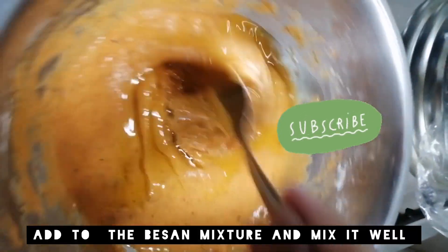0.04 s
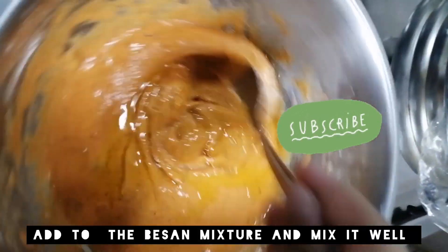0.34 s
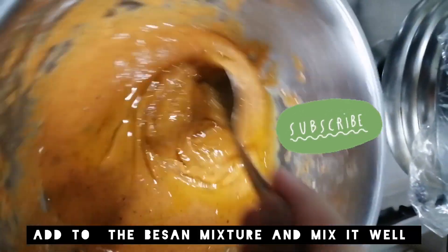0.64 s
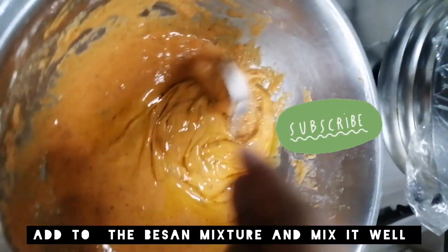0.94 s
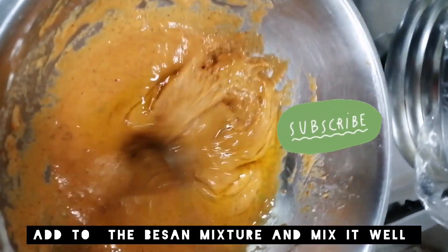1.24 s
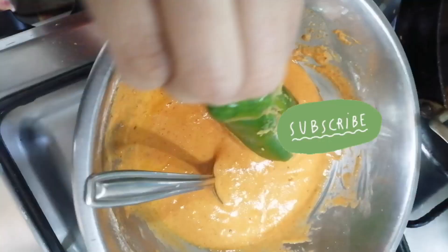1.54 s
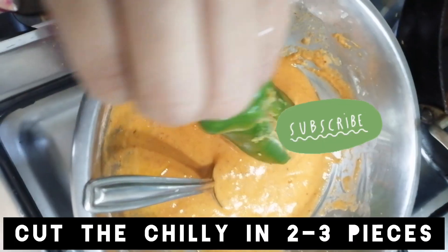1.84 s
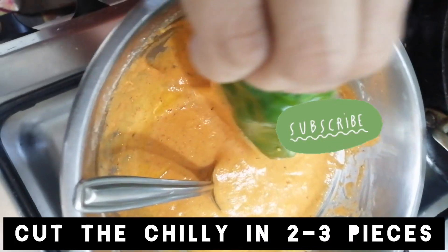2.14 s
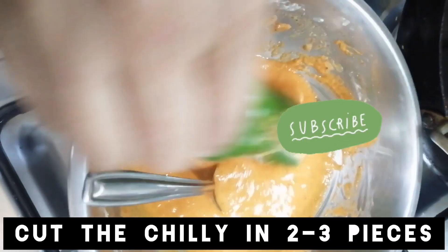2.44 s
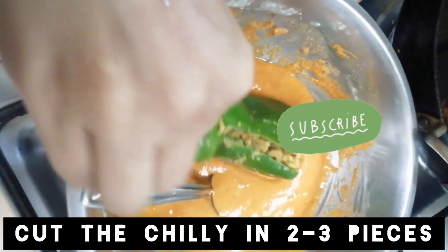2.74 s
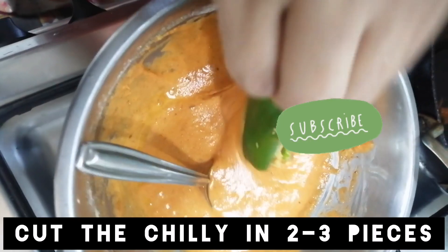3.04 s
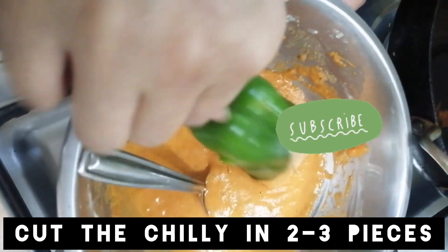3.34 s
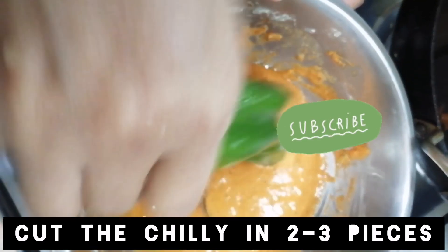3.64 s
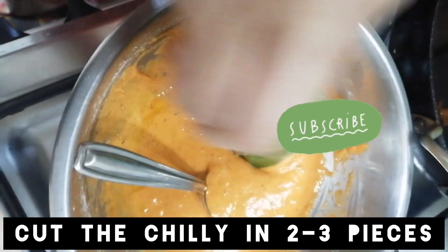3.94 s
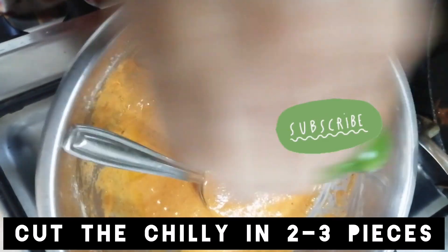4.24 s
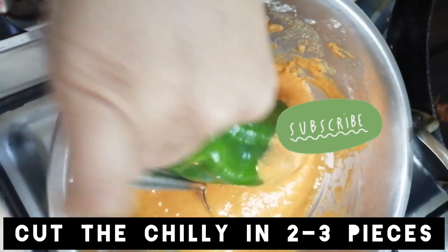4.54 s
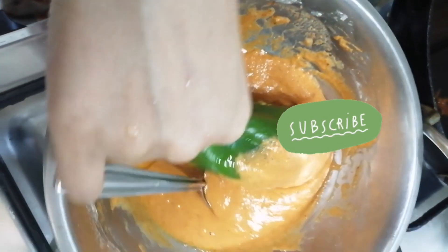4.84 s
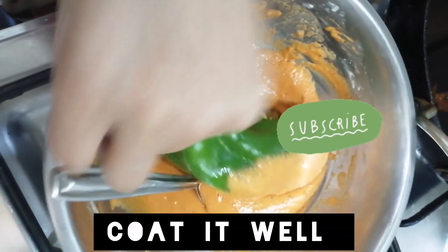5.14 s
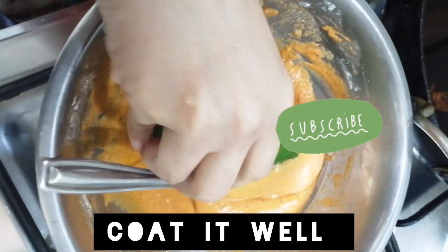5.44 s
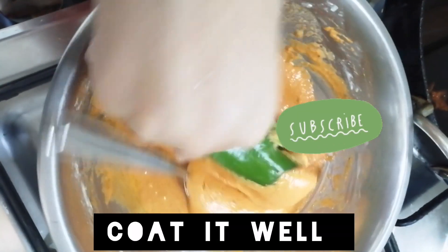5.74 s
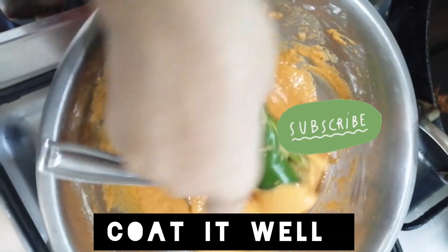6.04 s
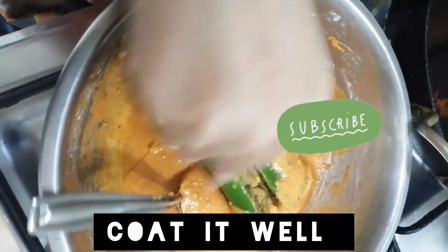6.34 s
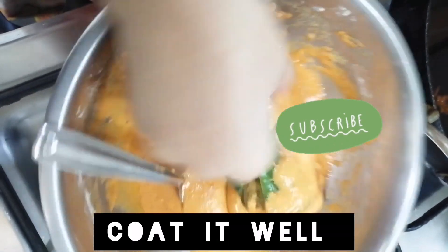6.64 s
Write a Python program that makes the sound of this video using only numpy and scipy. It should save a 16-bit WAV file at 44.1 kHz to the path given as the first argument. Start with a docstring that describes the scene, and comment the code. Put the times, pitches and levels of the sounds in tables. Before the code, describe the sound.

A spoon knocks and scrapes around a steel bowl for about a second and a half, churning thick batter that plops softly. The sound cuts out for a moment. Then come quieter, scattered bumps of the bowl, thin metallic scrapes and bright clinks of the spoon handle against the rim, ending with a faint squish. The microphone is close, the sound leans to the right, and a small kitchen hums faintly.

```python
"""Stirring batter in a steel bowl

A steel spoon stirs thick batter, scraping and knocking on the bowl, whose ring the batter damps.
After a short silence a hand turns a chilli in the batter: the bowl rocks and bumps, the batter
squishes, and the handle of the resting spoon slides and clinks along the rim.
A quiet kitchen hums behind it all; the right microphone hears most."""
import sys
import numpy as np
from scipy import signal
from scipy.fft import rfft, irfft, next_fast_len
from scipy.io import wavfile
from scipy.ndimage import uniform_filter1d, map_coordinates

SR = 44100
rng = np.random.default_rng(int(sys.argv[2]) if len(sys.argv) > 2 else 0)


def master(y):
    """Save y as 16-bit WAV."""
    cut = np.clip(np.atleast_2d(y).T, -1, 1)
    pcm = np.round(cut * 32767)  # scale
    wavfile.write(sys.argv[1], SR, pcm.astype(np.int16))


N = 303849
TIME_S = np.arange(N) / SR
STIR_END_S, CHILLI_START_S = 1.563, 1.883

# Knocks on the bowl: start_s, level_db, extra_thud_db, hardness_db, loss_per_bounce_db
KNOCKS = [(0.283, -18.5, -2.5, 5.5, 2), (0.372, -28.5, 15, 8, 30), (0.556, -29, 6, -3, 9.5),
          (0.741, -28.5, 3.5, 6, 7), (0.948, -25, 1, 4.5, 4), (0.989, -24.5, 4, 5.5, 0.5),
          (1.2404, -11, -1, 3, 39), (1.314, -23, 0, 4.5, 2), (1.375, -27.5, 4, 3.5, 10.5),
          (2.378, -35.5, 3, 2.5, 3), (2.442, -35.5, 13, 4, 6.5), (2.617, -41, 5, 1, 9.5),
          (3.25, -33.5, 0, 0.5, 7), (3.523, -39.5, 8, 7, 18), (3.573, -38, -15, 2.5, 10),
          (3.67, -37, 0.5, 3.5, 10), (3.703, -35.5, -2.5, -6, 10.5), (4.329, -34.5, 2.5, 3.5, 1.5),
          (4.4455, -24.5, 0, -14.5, 13.5), (4.567, -42, -5, 2, 6), (4.906, -31, -13, 1, 7),
          (5.075, -27, -2.5, -3, 25), (5.169, -32, -9.5, -7.5, 6.5), (5.557, -29.5, -13, -0.5, 7),
          (6.082, -36, -14, 4, 3.5), (6.188, -28, -10.5, 3, 3), (6.613, -35, -8, -3, 1),
          (6.664, -29, -13, 13.5, 8), (6.788, -35.5, -2, -1.5, 16)]
def bounces():
    """Each knock bounces, weaker and duller each time. Yields start_s, level_db and four band levels."""
    scatter = rng.standard_normal((len(KNOCKS), 3))
    for (start_s, level_db, thud_db, hardness_db, loss_db), chance in zip(KNOCKS, scatter):
        crack_db, ring_db, gap_s = (-9, -11.5, 0.02) if start_s < STIR_END_S else (-8, -6, 0.025)
        for k in range(3):
            treble_db = hardness_db - 3.5 * k
            tone_db = np.array([thud_db + 2 * k, 0, crack_db + treble_db, ring_db + treble_db])
            hit_db = level_db - k * loss_db
            chatter_db = hit_db - 13.5 - 0.4 * loss_db  # a square hit bounces and chatters less
            if k == 0 or hit_db > -59:  # fainter bounces drown in the room
                hit_s = start_s + gap_s * (k + 0.1 * chance[k] * (k > 0))
                yield hit_s, hit_db, tone_db - tone_db.max() + chatter_db


# The tone of a bare hit on the wall: pitch_hz, level_db
HIT_TONE = [(41, -46), (70, -11.5), (96, 6), (173, -7.5), (227, 6), (284, -3.5), (399, -3), (572, -10),
            (822, -9.5), (1150, -46.5), (2540, -16.5), (3820, -22), (5240, -11), (9220, -42), (15500, -49)]
# The bowl's modes (the notes it rings at): pitch_hz, width_hz, level_db
LOADED_BOWL_MODES = [(108, 13, -14), (259, 33, 3.5), (376, 30, -1.5), (875, 59, 7), (1684.8, 17, -31),
                     (2560, 12, -9.5), (2712, 30, 2.5), (2940, 42, -3.5), (4930, 59, -30), (5160, 27, -9),
                     (5482, 21, -19.5)]  # batter piled on one side
HELD_BOWL_MODES = [(103, 10, -28), (420.3, 124, 8.5), (803, 129, 10), (1680, 13, -28.5), (1840, 270, -13.5),
                   (2495, 94, -2.5), (2810, 230, -15), (3600, 37, -15.5), (4700, 20, -27.5),
                   (5670, 24, -14), (7300, 82, -23)]  # held for stirring
RESTING_BOWL_MODES = [(101, 3.9, -10), (237, 46, 6), (429, 21, -9), (775, 150, 3.5), (2020, 31, -24),
                      (2484, 65.26, -15), (2730, 15, -11), (3160, 19.12, -9.5), (4850, 66, -85),
                      (5130, 17, -10), (5115, 250, -3), (5930, 180, -10)]  # left standing
# The four bands of a knock (thud, clonk, crack, ring): low_hz, high_hz
KNOCK_BANDS = [(60, 520), (520, 1250), (1250, 3700), (3700, 16000)]
def bowl_knocks():
    """A hard push, then chatter that shakes the bowl; the batter damps the high notes first."""
    out, t = np.zeros(N), np.arange(SR // 4) / SR
    impulse = 1. * (t == 0)
    push = filtered(impulse, lambda hz: colour(HIT_TONE, hz))

    def struck_wall(modes, damping, push_db):
        return filtered(impulse, lambda hz: resonances(modes, hz, damping)) + amp(push_db) * push

    loaded = struck_wall(LOADED_BOWL_MODES, damping=1.03, push_db=-2.5)
    held = struck_wall(HELD_BOWL_MODES, damping=1.29, push_db=-1.5)
    resting = struck_wall(RESTING_BOWL_MODES, damping=0.79, push_db=-5)
    # One row for each band: gain_db, chatter, fade_s, snap_db
    band_settings = [(-0.5, 0.11, 0.15, 0.63), (-5, 0.084, 0.16, 1),
                     (-4.5, 0.21, 0.11, 2), (-3, 0.54, 0.053, 0.5)]
    for start_s, level_db, bands_db in bounces():
        wall = loaded if start_s < 0.5 else held if start_s < STIR_END_S else resting
        short_ring = wall * amp(-60 * t / 0.15)
        body, snap = 0, 0
        for band_db, (low_hz, high_hz), settings in zip(bands_db, KNOCK_BANDS, band_settings):
            gain_db, chatter, fade_s, snap_db = settings
            shaken = signal.fftconvolve(blow(t, chatter, fade_s), wall)[:len(t)]
            ring = band(shaken, low_hz, high_hz)
            body += amp(band_db + gain_db) * ring / np.std(ring[:SR // 50])
            snap += amp(band_db + snap_db) * unit(band(short_ring, low_hz, min(high_hz, 6500), order=2))
        snap_peak = max(amp(level_db - 3) - np.max(np.abs(body)), 0)  # a square hit tops its chatter
        add(out, start_s, body + snap_peak * snap / np.max(np.abs(snap)))
    return out


# Turns of the spoon: hardest_push_s, level_db
SPOON_TURNS = [(0.11, -57), (0.36, -42.5), (0.758, -44.5), (1.04, -54.5), (1.4, -56)]
# The spoon's first long drag over the steel: time_s, level_db
FIRST_DRAG = [(0.028, -83), (0.064, -52), (0.122, -55), (0.184, -68.5), (0.21, -59), (0.282, -56)]
# The tones of churned batter and of scraped steel: pitch_hz, level_db
CHURN_TONE = [(100, -23), (170, -23), (182, -18.5), (225, 4.5), (291, -12), (376, -4.5), (411, 2),
              (569, -15), (789, -5.5), (1090, -18), (1400, -51), (1820, -46), (3080, -120)]
SCRAPE_TONE = [(650, -50), (1100, -18.5), (1480, -7.5), (1680, -1), (1810, -2.5), (2310, -3.5),
               (2550, -6.5), (3110, -2), (4110, -10.5), (5420, 3.5), (5850, -3), (7470, -11.5),
               (8720, -21.5), (12300, -22), (15500, -25)]
def spoon_stirring(rise_s=0.13, fall_s=0.084, between_turns_db=-54.5):
    """The spoon churns the batter in soft lumps; its tip rasps on the steel and makes the bowl ring."""
    swells = sum(amp(db) * np.exp(np.minimum((TIME_S - push_s) / rise_s, (push_s - TIME_S) / fall_s))
                 for push_s, db in SPOON_TURNS)
    churn_db = 20 * np.log10(np.hypot(swells, amp(between_turns_db)))
    churn = friction(CHURN_TONE, slips_per_s=500, spread_db=5.5)
    bowl_boost = lambda hz: 1 + amp(2.5) * np.abs(resonances(HELD_BOWL_MODES, hz, damping=5.3))
    steel = lambda hz: colour(SCRAPE_TONE, hz) * bowl_boost(hz)
    rasp = unit(filtered(slips(slips_per_s=7000, spread_db=3.5), steel))
    whine = amp(3 * wobble(25)) * singing(2600 * (1 + 0.025 * wobble(18)), width_hz=220)
    scrape = unit(rasp + 0.55 * whine)
    # The scrape fades as batter coats the bowl, and swells with each turn.
    scrape_db = -62.5 - 4.5 * TIME_S + 0.59 * (churn_db - between_turns_db)
    drag_db, = curves(FIRST_DRAG)
    force = (amp(scrape_db) + touching(FIRST_DRAG) * amp(drag_db)) * amp(wobble(53))
    return (amp(churn_db - 4.5) * churn + force * scrape) * (TIME_S < STIR_END_S)


# Slides of the handle: start_s, length_s, level_db, lean_to_second_mode_db, rasp_db
SLIDES = [(2.851, 0.094, -63, 11, -2), (3.556, 0.031, -66.5, 16, -0.5), (4.406, 0.067, -68, 16, 3.5),
          (4.553, 0.1, -61.5, 10.5, -1), (4.879, 0.11, -60, 2, -1.5), (5.034, 0.051, -53, -1, 7.5),
          (5.142, 0.043, -61.5, -2, 3.5), (5.346, 0.016, -61.5, -11, 9), (5.516, 0.14, -57, 1.5, 9.5),
          (5.726, 0.09, -56, 0, 12), (5.881, 0.13, -57, 4, 0.5), (6.009, 0.035, -56, 13.5, 5.5),
          (6.13, 0.022, -51.5, 12, -5), (6.312, 0.23, -57, 2, -3.5), (6.553, 0.07, -54, 1, -4.5),
          (6.634, 0.12, -59, 15.5, -4)]
# The handle's two lowest modes as the touching point moves: time_s, first_hz, second_hz
HANDLE_PITCHES = [(5.6, 2520, 4670), (5.726, 2416, 4180), (5.826, 2315, 4250), (6.034, 2420, 4720),
                  (6.29, 2370, 4930), (6.39, 2418, 4870), (6.484, 2420, 4336), (6.66, 2370, 4640)]
# The high modes of the handle on the rim: pitch_hz, width_hz, level_db
RIM_MODES = [(5260, 260, -18.5), (5980, 110, -14), (6520, 93, -5.5), (6980, 37, 5.5), (8740, 250, -6),
             (12160, 92, -19), (14560, 46, 1), (14300, 87, -11.5)]
# The tone of the gritty rubbing: pitch_hz, level_db
GRIT_TONE = [(2180, -30), (3700, -8.5), (4180, 0), (6310, -5), (7000, -1.5), (7860, -9), (9000, -8),
             (9560, -12.5), (10500, -16.5), (11400, -10), (12300, -22.5), (14400, -13), (15300, -6.5),
             (16000, -29.5)]
# A hard slide locks into a squeal: time_s, pitch_hz, level_db
SQUEAL = [(5.715, 7120, -56), (5.731, 7000, -51), (5.751, 7070, -45), (5.785, 7200, -52), (5.83, 6940, -76)]
def handle_slides():
    """The handle sticks and slips on the rim; its notes shift and swell as the touching point moves."""
    first_hz, second_hz = curves(HANDLE_PITCHES)
    unmoved = TIME_S < HANDLE_PITCHES[0][0]  # the handle lies at one spot until the hand shifts it
    first = singing(np.where(unmoved, 2420, first_hz), width_hz=300) * amp(2.5 * wobble(22))
    second = np.where(unmoved, singing(4280, width_hz=260), singing(second_hz, width_hz=500))
    drift = 1 + 0.01 * wobble(22)
    rim = sum(amp(db + 5 * wobble(28)) * np.sqrt(width_hz) * singing(hz * drift, width_hz + 0.036 * hz)
              for hz, width_hz, db in RIM_MODES)
    grit = friction(GRIT_TONE, slips_per_s=3200, spread_db=1.5)
    rasp = unit(unit(rim) + 0.8 * grit)
    sizzle = filtered(rasp, lambda hz: hz > 10000)
    out = np.zeros(N)
    for start_s, length_s, level_db, lean_db, rasp_db in SLIDES:
        ease_db = 5 * np.clip(TIME_S - start_s, 0, length_s)  # the hand eases off along a slide
        gain = amp(level_db - ease_db) * stroke(start_s, length_s, rise_s=0.024, fall_s=0.015)
        force = np.minimum((gain * amp(rasp_db + 46)) ** 0.74, 1.3)
        rubbing = rasp + (force - 1) * sizzle  # only hard slides wake the highest modes
        notes = amp(-lean_db / 2 - 2.5) * first + amp(lean_db / 2 - 10) * second
        out += gain * (notes + amp(rasp_db - 4) * rubbing)
    squeal_hz, squeal_db = curves(SQUEAL)
    out += touching(SQUEAL) * amp(squeal_db - 3) * singing(squeal_hz, width_hz=340)
    return out * amp(1.8 * wobble(130))  # the level flickers


# Taps of the handle on the rim: start_s, level_db, brightness_db
CLINKS = [(3.2768, -36, -11), (3.572, -61, -25), (5.457, -45.5, -12.5), (5.5902, -30, -2),
          (6.0433, -23, -5), (6.2416, -35, -12), (6.2776, -22, -6.5), (6.6614, -25.5, -19),
          (6.683, -28.5, -18)]
# The tone of one tap: pitch_hz, level_db
TAP_TONE = [(820, -29), (1400, -21), (1820, -27.5), (2430, -3.5), (3430, -3.5), (3840, -9), (5160, 4.5),
            (6330, -3), (7080, 4.5), (7600, -7.5), (9040, -2), (9910, -27), (13200, -23), (15200, -5.5),
            (16000, -32)]
def handle_clinks():
    """The handle taps the rim and buzzes to rest; sharper taps are brighter."""
    out, t = np.zeros(N), np.arange(SR // 5) / SR
    handle = lambda hz: resonances([(2420, 200, 8.5), (4100, 19.33, 5)], hz, damping=0.33)
    modes = lambda hz: resonances(RIM_MODES, hz, damping=0.99) + handle(hz)
    for start_s, level_db, brightness_db in CLINKS:
        force = blow(t, chatter=0.3, fade_s=0.062)
        ring = filtered(force, lambda hz: colour(TAP_TONE, hz) + amp(-1.5) * modes(hz))
        clink = unit(band(ring, 1700, 5030)) + amp(brightness_db + 6) * unit(band(ring, 6800, 15000))
        add(out, start_s, amp(level_db - 6.5) * clink / np.max(np.abs(clink)))
    return out


# Air pockets closing in the batter: start_s, level_db, final_pitch_hz
PLOPS = [(0.578, -52, 251), (0.663, -28.5, 410), (0.802, -41, 384), (1.129, -43, 518), (1.396, -28.5, 237),
         (2.554, -43, 237)]
def batter_plops(rise_s=0.00047, fade_s=0.058):
    """Air pockets ring briefly in the thick batter, their pitch sinking."""
    out, t = np.zeros(N), np.arange(SR // 8) / SR
    for start_s, level_db, final_pitch_hz in PLOPS:
        pitch_hz = final_pitch_hz * (1 + 0.15 * np.exp(-t / 0.0025))
        gain = amp(level_db - 1 - 60 * t / fade_s) * (1 - np.exp(-t / rise_s))
        add(out, start_s, gain * np.sin(2 * np.pi * np.cumsum(pitch_hz) / SR))
    return out


# The tone of squeezed batter: pitch_hz, level_db
SQUISH_TONE = [(180, -28), (300, -2), (675, -4), (808, -6), (968, -3.5), (1890, -17), (2120, -35),
               (2570, -22), (3790, -44), (5720, -22.5), (6500, -33), (8450, -63.5), (14300, -120)]
def chilli_squish():
    """Wet batter crackles softly as the chilli is pushed in."""
    push = stroke(start_s=6.788, length_s=0.037, rise_s=0.028, fall_s=0.027)
    return amp(-45) * push * friction(SQUISH_TONE, slips_per_s=920, spread_db=1)


# How long the room's echo takes to fall by 60 dB: pitch_hz, fade_s
ECHO_FADES = [(150, 0.4), (1000, 0.19), (5000, 0.2), (14000, 0.18)]
def kitchen_echo(sound):
    """The walls throw the sound back; each pitch dies away at its own speed."""
    hz, t, noise = signal.stft(rng.standard_normal(SR // 2), SR, nperseg=256)
    tail = signal.istft(noise * amp(-60 * t / along(ECHO_FADES, hz)[:, None]), SR, nperseg=256)[1]
    delayed_tail = np.pad(tail / np.linalg.norm(tail), (SR // 150, 0))
    return signal.fftconvolve(sound, delayed_tail)[:N]


# The tones of the room's rumble and hiss: pitch_hz, level_db
RUMBLE_TONE = [(12, -39.5), (20, -5.5), (80, -6), (107, -11.5), (145, 4), (158, -5.5), (189, -13.5),
               (252, -15), (340, -23.5), (400, -19.5), (520, -32), (880, -120)]
HISS_TONE = [(160, -33.5), (280, 4), (305, -4.5), (441, -8.5), (596, -8), (742, -8), (907, -8), (1310, -10),
             (2170, -17.5), (2360, -17.5), (2800, -14), (3910, -27.5), (5120, -16), (7790, -37),
             (15500, -33.5)]
# The notes of a humming appliance: pitch_hz, level_db
HUM_NOTES = [(107.7, -61), (145.3, -63), (236.9, -64.5)]
# How the background is shared between the sides: pitch_hz, left_minus_right_db
ROOM_BALANCE = [(60, -6.5), (110, -9.5), (200, -12.5), (380, -17.5), (700, -14.5), (1290, -21),
                (2380, -15.5), (4400, -18), (8120, -5), (15000, -4)]
def kitchen_background():
    """An appliance's wavering hum, a soft hiss and a low rumble that is louder during the stirring."""
    rumble_db = -59 + 6.5 * (TIME_S < STIR_END_S) - 0.3 * wobble(11)
    noise = rng.standard_normal(N) + 0.83 * rng.standard_normal((2, N))  # partly alike on both sides
    rumble = amp(rumble_db) * unit(filtered(noise, lambda hz: amp(along(RUMBLE_TONE, hz))))
    hum = sum(amp(db - 6.5 + 3.6 * wobble(5.8)) * np.sin(2 * np.pi * hz * TIME_S + 1.2 * wobble(14))
              for hz, db in HUM_NOTES)
    hiss = unit(filtered(rng.standard_normal((2, N)), lambda hz: amp(along(HISS_TONE, hz))))
    left, right = rumble + hum + amp(-64.34 + 1.6 * wobble(5.78)) * hiss
    return microphones(left, right, ROOM_BALANCE)


def microphones(left, right, balance):
    """The left microphone is muffled; the two gains average to one."""
    share = lambda hz: 2 / (1 + amp(-along(balance, hz)))
    return np.array([filtered(left, share), filtered(right, lambda hz: 2 - share(hz))])


def blow(t, chatter, fade_s):
    """The force of a hit: one sharp push, then chatter that falls 60 dB in fade_s."""
    return (t == 0) + chatter * rng.standard_normal(len(t)) * amp(-60 * t / fade_s)


def slips(slips_per_s, spread_db):
    """The force of rubbing: tiny slips at random moments and of uneven size."""
    moments = rng.random(N) < slips_per_s / SR
    return unit(moments * rng.standard_normal(N) * amp(spread_db * rng.standard_normal(N)))


def friction(tone, slips_per_s, spread_db):
    """The sound of rubbing: tiny slips shaped by a tone table."""
    return unit(filtered(slips(slips_per_s, spread_db), lambda hz: colour(tone, hz)))


def singing(pitch_hz, width_hz):
    """A mode kept ringing by rubbing: a restless note that follows pitch_hz."""
    phase = 2 * np.pi * np.cumsum(pitch_hz * np.ones(N)) / SR
    return unit(wobble(width_hz) * np.cos(phase) + wobble(width_hz) * np.sin(phase))


def stroke(start_s, length_s, rise_s, fall_s):
    """The gain of a stroke: it builds up, holds, then dies away."""
    t = TIME_S - start_s
    return np.clip(t / rise_s, 0, 1) * np.exp(-np.maximum(t - length_s, 0) / fall_s)


def touching(rows):
    """1 between a table's first and last times, with short ramps to 0."""
    return np.clip(np.minimum(TIME_S - rows[0][0], rows[-1][0] - TIME_S) / 0.003, 0, 1)


def resonances(modes, hz, damping):
    """A filter that rings at each mode; damping scales the widths, and wider modes die sooner."""
    total = 0
    for k, (pitch_hz, width_hz, level_db) in enumerate(modes):
        loss = 1j * hz * width_hz * damping
        total += (-1) ** k * amp(level_db) * loss / (pitch_hz ** 2 - hz ** 2 + loss)
    return total


def colour(tone, hz):
    """A filter shaped like a tone table that never sounds before it is struck (minimum phase)."""
    cepstrum = irfft(np.log(amp(along(tone, hz)) + 1e-6))
    half = len(cepstrum) // 2
    cepstrum[1:half] *= 2
    cepstrum[half + 1:] = 0
    return np.exp(rfft(cepstrum))


def filtered(sound, response):
    """Multiply each frequency in a sound by response(hz)."""
    size = sound.shape[-1]
    padded = 2 * next_fast_len(size // 2 + 4096)
    return irfft(rfft(sound, padded) * response(np.fft.rfftfreq(padded, 1 / SR)), padded)[..., :size]


def band(sound, low_hz, high_hz, order=3):
    """Keep what lies between two frequencies."""
    return signal.sosfilt(signal.butter(order, [low_hz, high_hz], "band", fs=SR, output="sos"), sound)


def wobble(points_per_s):
    """A smooth curve through random points."""
    points = rng.standard_normal(int(N * points_per_s / SR) + 4)
    return map_coordinates(points, [TIME_S * points_per_s])


def curves(rows):
    """One value per sample for each column after the time."""
    times_s, *columns = np.transpose(rows)
    return [np.interp(TIME_S, times_s, column) for column in columns]


def along(rows, hz):
    """Read between the rows of a (pitch_hz, value) table, on a log scale of pitch."""
    pitches_hz, values = np.transpose(rows)
    return np.interp(np.log(hz + 1), np.log(pitches_hz + 1), values)


def add(track, start_s, sound):
    """Mix a sound into the track at start_s."""
    start = round(start_s * SR)
    track[start:start + len(sound)] += sound[:max(N - start, 0)]


def amp(db):
    """Turn decibels into a gain."""
    return 10 ** (np.asarray(db) / 20)


def unit(sound):
    """Scale to an average (rms) level of 1."""
    return sound / np.sqrt(np.mean(sound ** 2) + 1e-20)


# How the bowl's sound is shared between the sides: pitch_hz, left_minus_right_db
BOWL_BALANCE = [(100, -11.5), (400, -22), (950, -17), (1500, -37.5), (5000, -41.5), (7000, -36),
                (15000, -33)]
def scene():
    """Bowl, spoon and batter, close by in a small kitchen; the left side hears them a little later."""
    bowl = bowl_knocks() + batter_plops() + spoon_stirring()
    bowl += handle_slides() + handle_clinks() + chilli_squish()
    delayed = np.pad(bowl, (SR // 3000, 0))[:N]
    left = amp(0.5) * delayed + amp(-11) * kitchen_echo(bowl)
    right = bowl + amp(-8) * kitchen_echo(bowl)
    return microphones(left, right, BOWL_BALANCE) + kitchen_background()


def record(dry):
    """The sound drops out between the two tasks, and the very highest treble is cut off."""
    audible = (TIME_S < STIR_END_S) | (TIME_S > CHILLI_START_S)
    gate = uniform_filter1d(1. * audible, size=128)
    return filtered(dry * gate, lambda hz: hz < 15800)


dry = scene()
out = record(dry)
master(out)
```